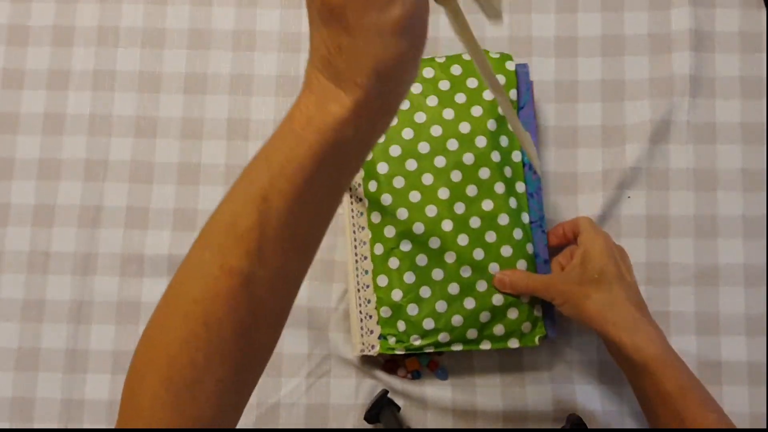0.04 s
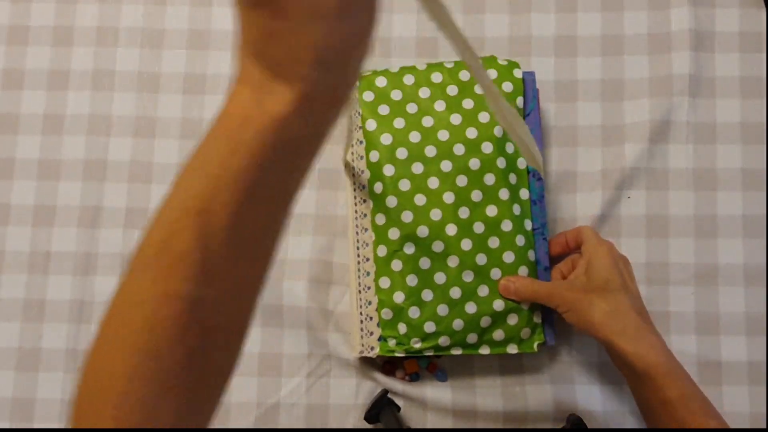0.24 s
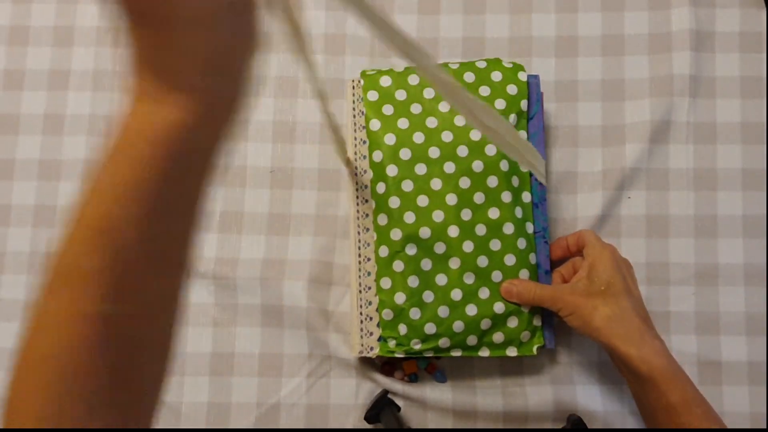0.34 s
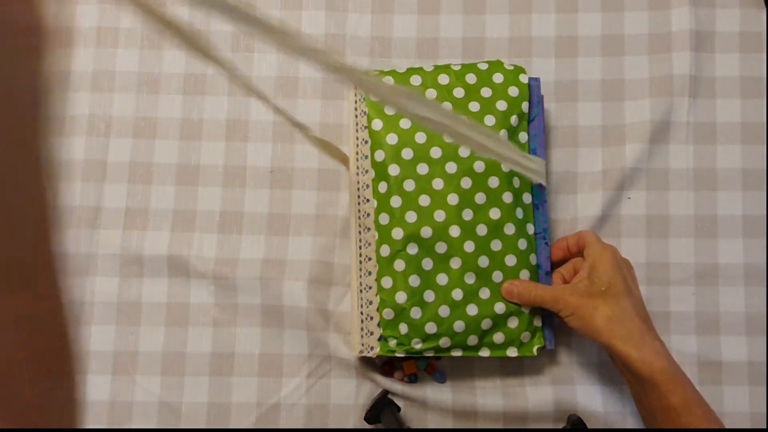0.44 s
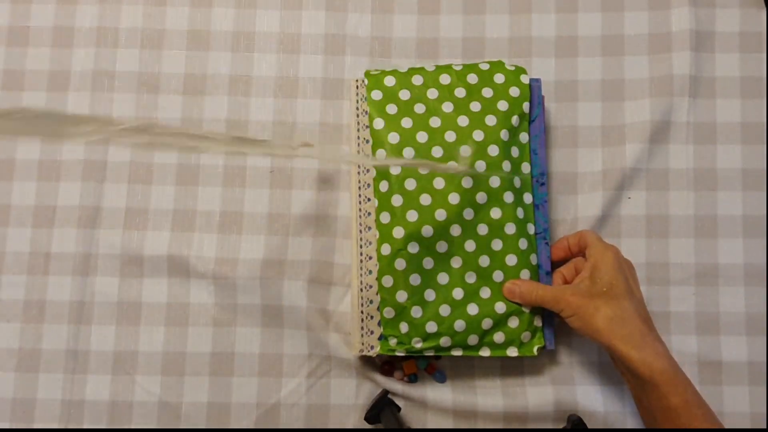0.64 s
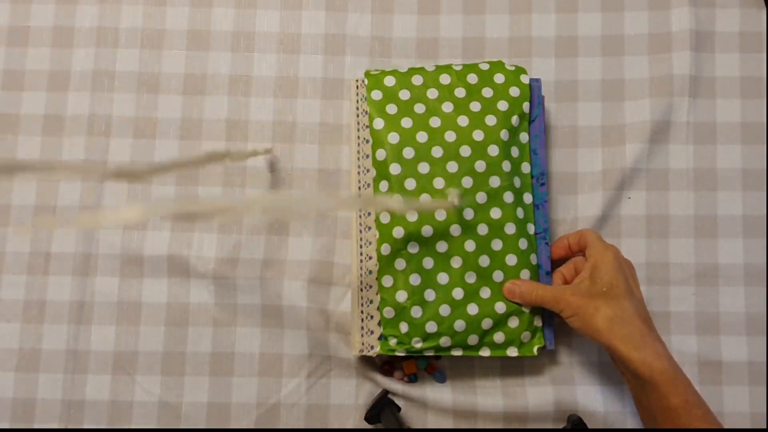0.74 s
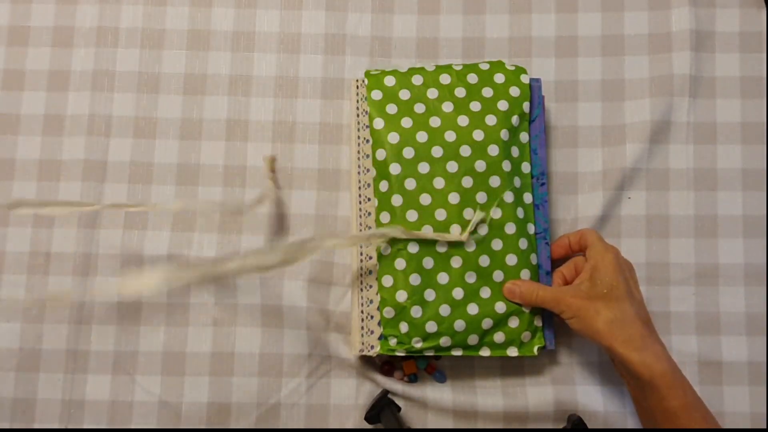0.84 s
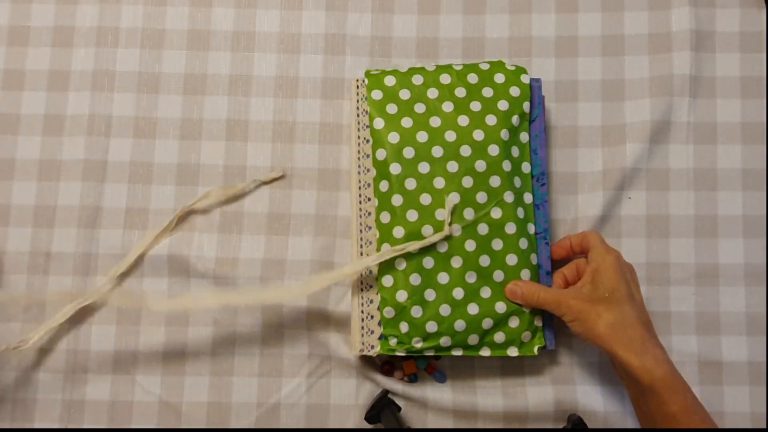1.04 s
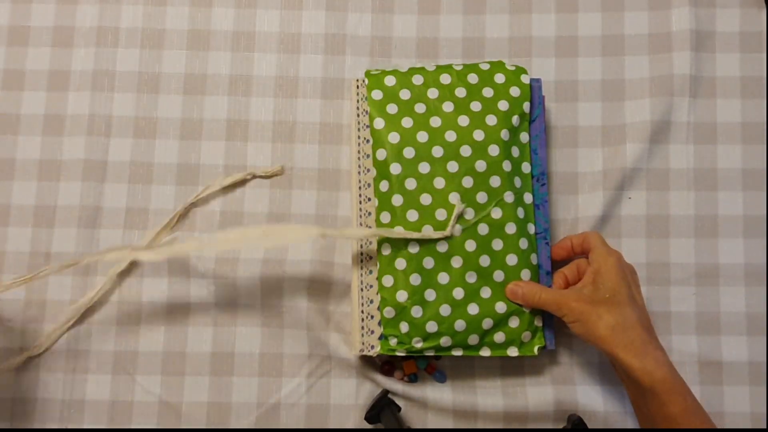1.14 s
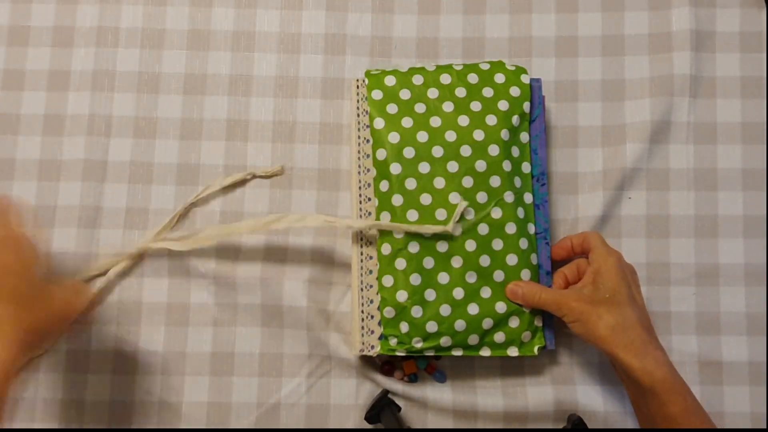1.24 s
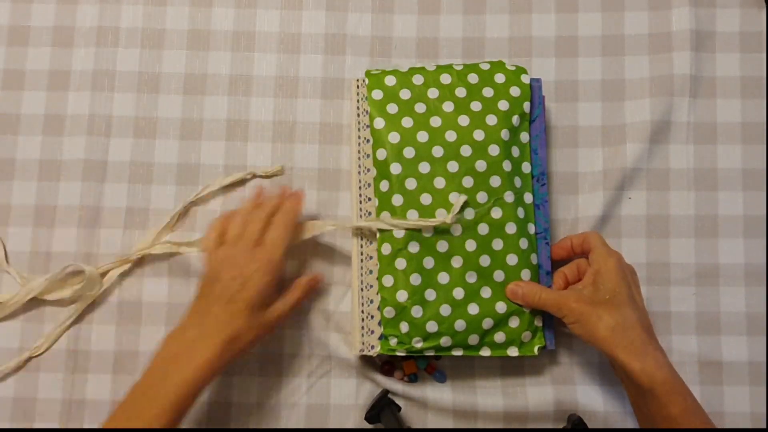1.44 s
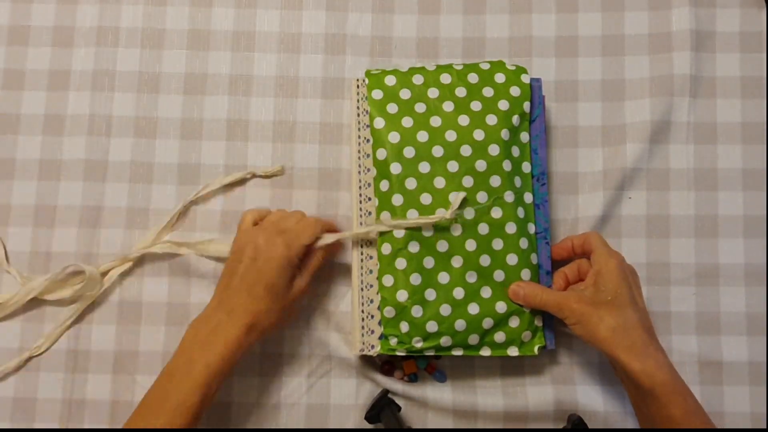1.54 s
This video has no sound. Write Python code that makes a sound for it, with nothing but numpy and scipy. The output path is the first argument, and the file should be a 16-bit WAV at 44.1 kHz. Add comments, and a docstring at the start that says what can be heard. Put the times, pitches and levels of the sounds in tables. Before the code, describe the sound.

A ribbon is pulled off a cloth-covered book with rasping swishes and small snaps, slipping free with a light knock. Its ends brush the tablecloth, then a hand lands softly. Close up in a small quiet room.

```python
"""A small quiet room, close to a table: a ribbon is pulled off a cloth-covered book. It rasps over the cover in
stick-slip, snaps, catches in bright swishes and drones low while taut until it slips free with a light knock.
Its tail runs out with a faint zip, the loose ends tick and brush down on the tablecloth, and a hand lands
softly beside them."""
import sys
import numpy as np
from scipy import signal
from scipy.fft import rfft, irfft, next_fast_len
from scipy.io import wavfile
from scipy.ndimage import map_coordinates

SR = 44100
rng = np.random.default_rng(int(sys.argv[2]) if len(sys.argv) > 2 else 0)


def to_wav(sig):
    """Store sig (one row per channel, or 1-D mono) as 16-bit WAV at the path in sys.argv[1].

    Samples outside -1..1 are clipped; the rate is SR.
    """
    pcm = np.clip(np.atleast_2d(sig), -1, 1) * 32767
    pcm = np.round(pcm).astype(np.int16)
    wavfile.write(sys.argv[1], SR, pcm.T)  # frames by channels


N = 70560
T = np.arange(N) / SR

# background air spectrum (frequency [Hz], relative level [dB])
AIR_SPECTRUM = [(25, -27), (45, 7), (90, -4), (160, -4.5), (220, -9), (320, -5.5), (450, -13.5),
                (700, -29.5), (1500, -30.5), (3000, -33.5), (6500, -31), (7600, -41), (15500, -41)]
# background air, left against right (frequency [Hz], correlation [-])
AIR_CORRELATION = [(60, 0.85), (300, 0.72), (1000, 0.17), (3000, 0.17)]
# ribbon friction on the cover (time [s], level [dB])
SLIDE_LEVEL = [(0, -47.5), (.04, -59), (.09, -60.5), (.143, -55.5), (.168, -47), (.195, -48.5),
               (.22, -37.5), (.24, -42.5), (.257, -37.5), (.28, -45), (.302, -34.5), (.33, -43.5),
               (.365, -38.5), (.41, -35.5), (.465, -36), (.52, -37.5), (.55, -35), (.578, -47),
               (.61, -56.5), (.66, -61), (.73, -82)]
# friction spectrum (frequency [Hz], relative level [dB])
SLIDE_SPECTRUM = [(60, 5), (200, -4.5), (550, -9.5), (1100, -5.5), (2300, -5), (4500, -4), (6700, -4),
                  (7600, -5.5), (11000, -10), (15500, -16.5)]
# cover resonances (frequency [Hz], bandwidth [Hz], gain [dB])
COVER_MODES = [(572, 63, 0), (953, 52, 0), (1136, 60, -9), (2190, 34, -12.5)]
# hand shifts the book (time [s], level [dB], attack [s], t60 [s])
GRIPS = [(.012, -53, 0.0084, 0.22), (.148, -46.5, 0.021, 0.31), (.19, -48, 0.0081, 0.39)]
# scuffed cover spectrum (frequency [Hz], relative level [dB])
GRIP_SPECTRUM = [(60, -21), (180, 3), (270, 4.5), (420, 4.5), (580, 9.5), (800, -3), (1150, 4.5),
                 (1800, -17), (4000, -7), (12000, -45)]
# ribbon snaps and ticks (time [s], level [dB], centre [Hz], half-width [oct], t60 [s])
SNAPS = [(0.0172, -28, 1060, 0.86, 0.006), (0.03, -40, 1990, 1.94, .016), (.1535, -51, 1690, 1.4, 0.013),
         (0.4199, -32, 2630, 1, 0.0077), (0.433, -33, 1500, 4.8, 0.023), (0.4674, -28, 3240, 1.3, 0.0074),
         (0.4876, -37, 3780, 3.9, 0.0064), (.588, -30.5, 1800, 1.96, .016),
         (0.7775, -61.5, 4960, 0.76, 0.016), (0.8939, -44.5, 3560, 1.34, 0.0042),
         (.899, -70, 1880, 1.6, 0.18), (1.113, -56, 4840, .9, .01)]
# book gripped, then let go (time [s], level [dB])
KNOCKS = [(0.0174, -52), (0.539, -42)]
# knocked book modes (frequency [Hz], gain [dB], t60 [s])
BOOK_MODES = [(182.6, -5.5, 0.47), (297.6, -15.5, 0.92), (395, 13, 0.047), (441, 1, 0.15),
              (553.5, 6, 0.094)]
# drone of the taut ribbon (time [s], upper mode level [dB], lower mode level [dB])
DRONE_LEVELS = [(.14, -87, -85), (.2, -60.5, -50), (0.236, -44.5, -46.5), (.33, -45, -54), (.39, -40, -54),
                (0.446, -36.5, -39.5), (0.483, -42, -33.5), (0.521, -27, -41.5), (.548, -31, -50),
                (.59, -45, -58), (.65, -61, -61), (.76, -99, -108)]
# ribbon edge catches (time [s], duration [s], level [dB])
SWISHES = [(0.203, .027, -34), (0.285, 0.028, -33), (0.336, 0.012, -34), (0.363, 0.013, -34),
           (0.399, 0.0047, -33), (0.461, 0.0075, -37.5)]
# edge friction spectrum (frequency [Hz], relative level [dB])
SWISH_SPECTRUM = [(300, -3.5), (1200, -3.5), (3000, -5), (6200, 5), (7800, -1), (10500, -1.5),
                  (14000, -2.5), (15800, -8)]
# zip of the weave (time [s], frequency [Hz], level [dB])
ZIP_GLIDE = [(.6, 2137, -70), (.7, 2000, -78), (.78, 1855, -75.5), (.83, 1760, -97)]
# loose ends on the tablecloth (time [s], level [dB], attack [s], t60 [s])
BRUSHES = [(.79, -68.5, 0.031, 0.16), (.897, -69.5, 0.014, 0.33), (1.0, -77.5, 0.047, 0.16),
           (1.1105, -66.5, 0.0026, 0.49), (1.14, -76.5, 0.034, 1)]
# brushed cloth spectrum (frequency [Hz], relative level [dB])
BRUSH_SPECTRUM = [(500, -4.5), (1500, -13.5), (2600, -4), (4000, 3), (6500, 1), (8000, -3.5), (11000, -19),
                  (15500, -24)]
# arm, fingers, palm on the table (time [s], level [dB], attack [s])
THUDS = [(1.34, -53, .12), (1.552, -42, 0.0035), (1.585, -48, 0.0079)]
# table modes (frequency [Hz], gain [dB], t60 [s])
TABLE_MODES = [(79, -1, 0.15), (132, 8.5, 0.051), (189, 5.5, 0.09), (397, -9, 0.089)]
# hand rubs the tablecloth (time [s], level [dB], attack [s], t60 [s])
RUBS = [(1.553, -48, 0.029, 1)]
# rub spectrum (frequency [Hz], relative level [dB])
RUB_SPECTRUM = [(25, 5), (70, 5.5), (250, -12), (600, -15), (1000, -30), (3000, -37.5), (8000, -45),
                (15000, -59)]
# feed to the reflections (frequency [Hz], gain [dB])
ROOM_SEND = [(100, -25), (500, -4.5), (2000, 1), (6000, -4), (14000, -1)]
# room decay (frequency [Hz], t60 [s])
ROOM_T60 = [(150, 0.81), (1000, 0.34), (4000, 0.3), (14000, 0.34)]
# reflections, left against right (frequency [Hz], correlation [-])
ROOM_CORRELATION = [(100, 0.028), (500, 0.66), (1300, 0.13), (3000, 0.2)]
# stereo balance (frequency [Hz], left minus right [dB])
BALANCE = [(100, 1), (1000, 2), (5000, 1.5), (6500, 6), (8000, -1.5), (10000, 4.5), (12000, 0.5),
           (13300, 11.5), (14500, 6), (15500, -1)]


def amp(db):
    """Decibels to gain."""
    return 10 ** (np.asarray(db) / 20)


def unit_rms(x):
    """Scale to rms 1."""
    return x / np.sqrt(np.mean(x ** 2) + 1e-20)


def log_interp(points, hz):
    """Interpolate (frequency [Hz], value) points on a log axis."""
    knots_hz, values = np.transpose(points)
    return np.interp(np.log(hz + 1), np.log(knots_hz + 1), values)


def curves(rows):
    """One per-sample curve for each column after the time."""
    times_s, *columns = np.transpose(rows)
    return [np.interp(T, times_s, column) for column in columns]


def wobble(rate_hz):
    """Smooth random curve through Gaussian knots."""
    return map_coordinates(rng.standard_normal(4096), [T * rate_hz], mode="wrap")


def filtered(x, response):
    """Apply response(hz) by FFT."""
    size = next_fast_len(N + SR // 2)
    return irfft(rfft(x, size) * response(np.fft.rfftfreq(size, 1 / SR)), size)[..., :N]


def coloured(x, spectrum):
    """Shape by a spectrum table, at rms 1."""
    return unit_rms(filtered(x, lambda hz: amp(log_interp(spectrum, hz))))


def spread(pair, correlation):
    """Mix two independent signals to a stereo pair of given correlation."""
    angle = lambda hz: np.arccos(np.clip(log_interp(correlation, hz), -1, 1)) / 2
    mid, side = filtered(pair, lambda hz: np.array([np.cos(angle(hz)), np.sin(angle(hz))]))
    return np.array([mid + side, mid - side])


def placed(x, left_lead_s):
    """Direct sound in stereo, by arrival time difference."""
    return filtered(x, lambda hz: np.exp(1j * np.pi * hz * left_lead_s * np.array([[1], [-1]])))


def fibres(rate_hz, scatter_db):
    """Random impulses of threads slipping over each other."""
    impulses = (rng.random(N) < rate_hz / SR) * rng.standard_normal(N)
    return impulses * amp(scatter_db * rng.standard_normal(N))


def ring(start_s, modes, attack_s):
    """Damped modes after a soft blow."""
    age_s = np.maximum(T - start_s, 0)
    ringing = sum(amp(db - 60 * age_s / t60_s) * np.sin(2 * np.pi * hz * age_s)
                  for hz, db, t60_s in modes)
    return (1 - np.exp(-age_s / attack_s)) * ringing


def strokes(rows):
    """Summed envelopes: linear rise, exponential decay."""
    envelope = np.zeros(N)
    for start_s, db, attack_s, t60_s in rows:
        rise = np.clip((T - start_s) / attack_s, 0, 1)
        envelope += rise * amp(db - 60 * np.maximum(T - start_s - attack_s, 0) / t60_s)
    return envelope


def room_tone(air_db=-63.5, hum_hz=49.3, hum_db=-61):
    """Dull background air and a low, wavering hum."""
    air = spread(coloured(rng.standard_normal((2, N)), AIR_SPECTRUM), AIR_CORRELATION)
    hum = np.sqrt(2) * np.sin(2 * np.pi * hum_hz * T + 0.66 * wobble(18)) * amp(0.5 * wobble(11.1))
    return amp(air_db) * air + amp(hum_db) * hum


def cover(friction):
    """The book's cover adds its resonances to the friction."""
    resonances = lambda hz: sum(amp(db) * 1j * hz * width_hz / (mode_hz**2 - hz**2 + 1j * hz * width_hz)
                                for mode_hz, width_hz, db in COVER_MODES)
    return unit_rms(filtered(friction, lambda hz: 1 + resonances(hz)))


def ribbon_slide(slip_hz=92.32, jitter=0.15, depth_db=10, treble_hz=4720, slack_db=-35):
    """Stick-slip clumps the thread impulses; below slack_db the treble falls faster than the rest."""
    level_db, = curves(SLIDE_LEVEL)
    cycles = np.cumsum(slip_hz * (1 + jitter * wobble(119.96))) / SR
    slip_db = depth_db * np.cos(np.pi * cycles) ** 4
    friction = fibres(rate_hz=18000, scatter_db=1) * amp(slip_db + 0.88 * wobble(400))
    rasp = cover(coloured(friction, SLIDE_SPECTRUM))
    body = filtered(rasp, lambda hz: 1 / (1 + (hz / treble_hz) ** 2))
    treble_db = 0.74 * np.minimum(level_db - slack_db, 0)
    return amp(level_db) * (body + (rasp - body) * amp(treble_db))


def grips():
    """The gripping hand scuffs the cloth cover."""
    return strokes(GRIPS) * coloured(fibres(rate_hz=4300, scatter_db=0.5), GRIP_SPECTRUM)


def ribbon_snaps(impulse_ratio=0.5, skirt_db=-18, cloth_cutoff_hz=8100):
    """Each snap: an impulse and a brief crackle in one broad resonance, dulled by the cloth."""
    out = np.zeros(N)
    for start_s, db, centre_hz, width_oct, t60_s in SNAPS:
        decay = (T >= start_s) * amp(-60 * np.maximum(T - start_s, 0) / t60_s)
        crackle = unit_rms(decay * rng.standard_normal(N))
        impulse = unit_rms(signal.unit_impulse(N, round(start_s * SR)))
        peak = lambda hz: np.exp(-(np.log2((hz + 1) / centre_hz) / width_oct) ** 2)
        response = lambda hz: (peak(hz) + amp(skirt_db)) / (1 + (hz / cloth_cutoff_hz) ** 4)
        crack = filtered(crackle + impulse_ratio * impulse, response)
        out += amp(db) * unit_rms(crack) * np.sqrt(np.mean(decay ** 2))
    return out


def book_knocks():
    """Light knocks ring the book's higher modes."""
    return sum(amp(db) * ring(start_s, BOOK_MODES, attack_s=0.0076) for start_s, db in KNOCKS)


def ribbon_drone(modes_hz=(114, 88), in_phase_s=0.41, wander_rad=0.27):
    """Two low modes of the taut ribbon beat against each other."""
    out = np.zeros(N)
    for hz, db in zip(modes_hz, curves(DRONE_LEVELS)):
        phase_rad = 2 * np.pi * hz * (T - in_phase_s) + wander_rad * wobble(23.3)
        out += amp(db) * np.sqrt(2) * np.cos(phase_rad)
    return out


def edge_swishes():
    """The ribbon's edge catches on the cover: short arches of bright friction."""
    arches = np.zeros(N)
    for start_s, duration_s, db in SWISHES:
        progress = np.clip((T - start_s) / duration_s, 0, 1)
        arches += amp(db) * np.sqrt(np.abs(np.sin(np.pi * progress)))
    friction = fibres(rate_hz=16000, scatter_db=1.5) * amp(3 * wobble(302.3))
    return arches * coloured(friction, SWISH_SPECTRUM)


def weave_zip():
    """The weave gives a faint, rough, falling tone as the ribbon's tail runs out."""
    hz, db = curves(ZIP_GLIDE)
    gate = (T > ZIP_GLIDE[0][0]) & (T < ZIP_GLIDE[-1][0])
    roughness = wobble(280) + 1j * wobble(250)
    carrier = np.exp(2j * np.pi * np.cumsum(hz) / SR)
    return amp(db) * gate * np.real(roughness * carrier)


def loose_ends(touch_s=1.57, touch_db=-69, rise_s=0.037):
    """The ends brush the tablecloth; from touch_s, fingertips slide on them."""
    fingertips = amp(touch_db) * np.clip((T - touch_s) / rise_s, 0, 1)
    friction = coloured(fibres(rate_hz=20000, scatter_db=2), BRUSH_SPECTRUM)
    return (strokes(BRUSHES) + fingertips) * friction


def hand_landing():
    """The arm leans, fingers and palm land: soft table thuds and a dull rub."""
    thuds = sum(amp(db) * ring(start_s, TABLE_MODES, attack_s) for start_s, db, attack_s in THUDS)
    return thuds + strokes(RUBS) * coloured(rng.standard_normal(N), RUB_SPECTRUM)


def reflections(x, path_s=0.07, early_db=7, early_t60_s=0.055):
    """Early echoes off table and walls plus a short tail, redrawn every path_s as the source moves."""
    send = filtered(x, lambda hz: amp(log_interp(ROOM_SEND, hz)))
    hop, wet = round(path_s * SR), np.zeros((2, N + SR))
    for start in range(0, N, hop):
        hz, age_s, noise = signal.stft(rng.standard_normal((2, SR // 3)), SR, nperseg=256)
        early = amp(early_db - 60 * age_s / early_t60_s)
        tail = amp(-60 * age_s / log_interp(ROOM_T60, hz)[:, None])
        response = signal.istft(noise * (early + tail), SR, nperseg=256)[1]
        response /= np.linalg.norm(response[0])
        echoes = signal.fftconvolve(send[None, start:start + hop], response, axes=1)
        wet[:, start:start + echoes.shape[1]] += echoes
    return spread(wet[:, :N], ROOM_CORRELATION)


def scene():
    """Book slightly right, loose ends and hand to its left; drone and knocks dry."""
    at_book = ribbon_slide() + edge_swishes() + ribbon_snaps() + grips()
    at_cloth = loose_ends() + weave_zip() + hand_landing()
    direct = placed(at_book, left_lead_s=-53e-6) + placed(at_cloth, left_lead_s=335e-6)
    mix = direct + reflections(at_book + at_cloth) + ribbon_drone() + book_knocks()
    balanced = filtered(mix, lambda hz: amp(log_interp(BALANCE, hz) * np.array([[0.5], [-0.5]])))
    return balanced + room_tone()


def record(dry, low_cut_hz=33, band_limit_hz=15800):
    """Microphone bass roll-off and a hard band limit."""
    highpass = signal.butter(2, low_cut_hz, "highpass", fs=SR, output="sos")
    return filtered(signal.sosfilt(highpass, dry), lambda hz: hz < band_limit_hz)


dry = scene()
out = record(dry)
to_wav(out)
```